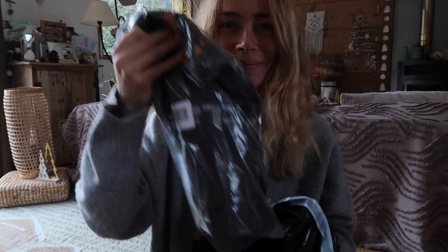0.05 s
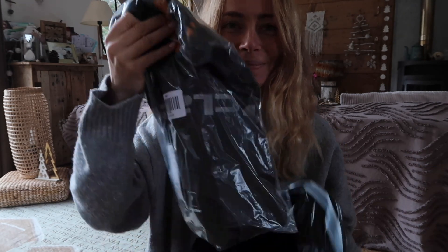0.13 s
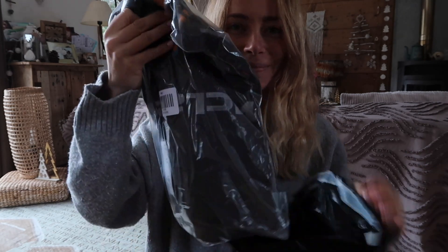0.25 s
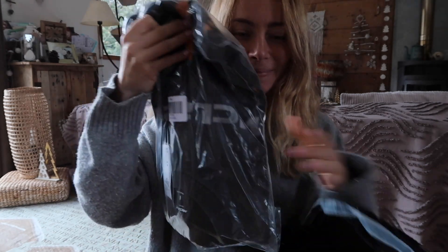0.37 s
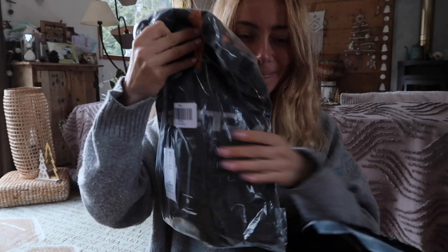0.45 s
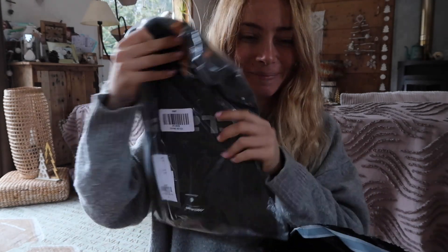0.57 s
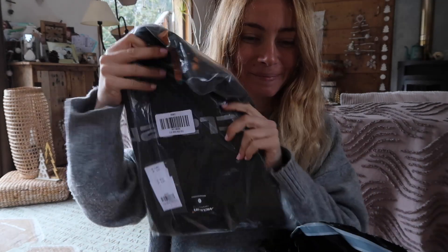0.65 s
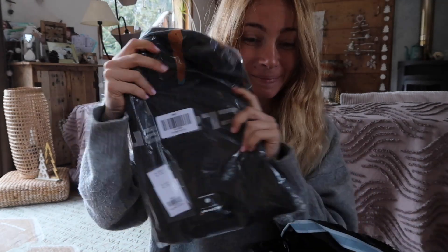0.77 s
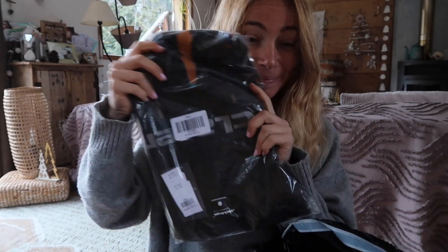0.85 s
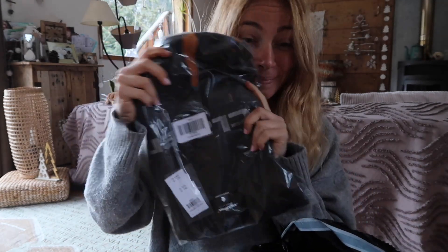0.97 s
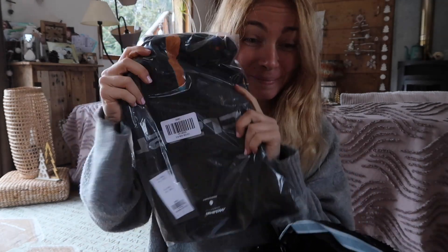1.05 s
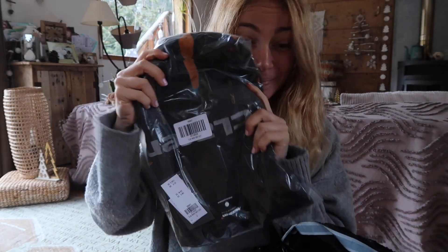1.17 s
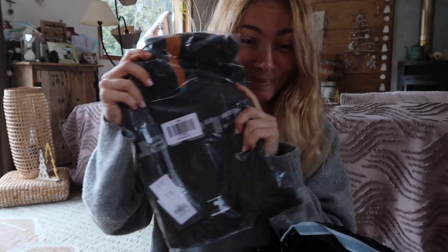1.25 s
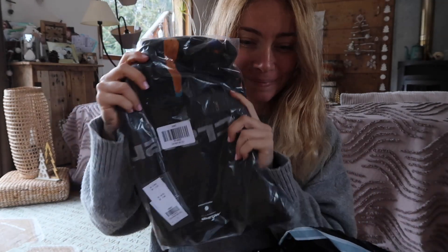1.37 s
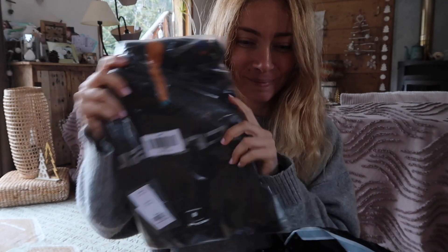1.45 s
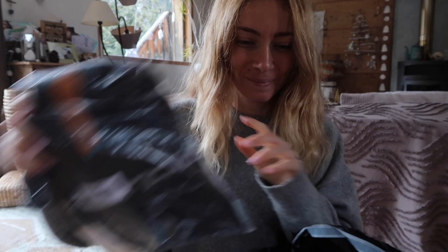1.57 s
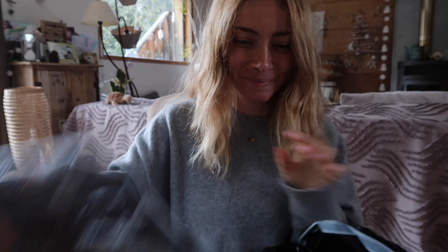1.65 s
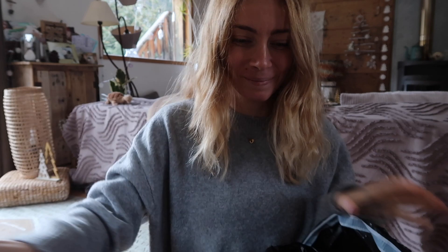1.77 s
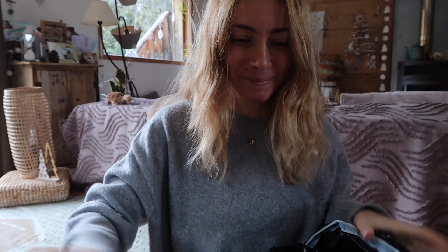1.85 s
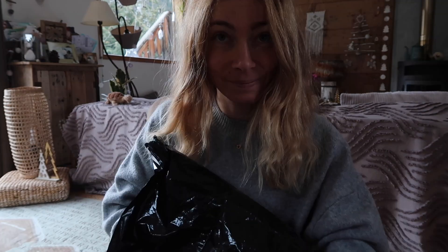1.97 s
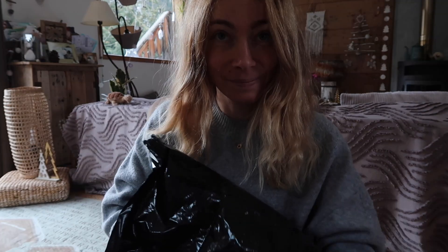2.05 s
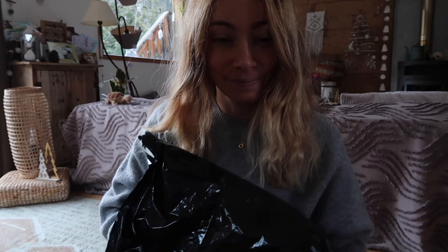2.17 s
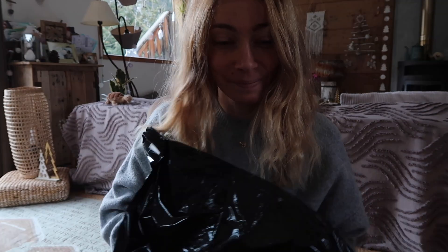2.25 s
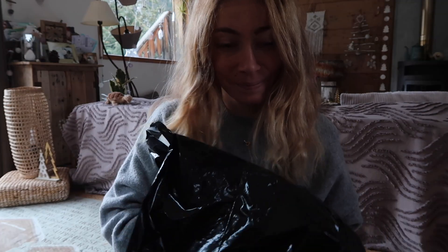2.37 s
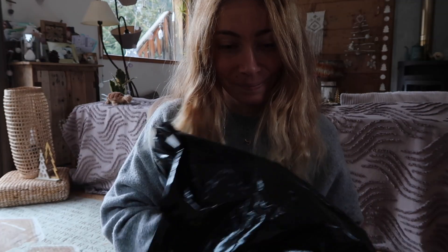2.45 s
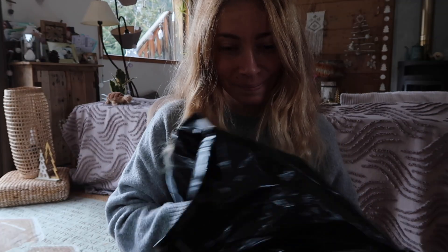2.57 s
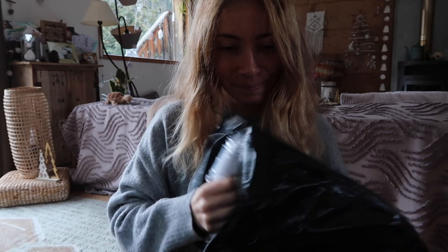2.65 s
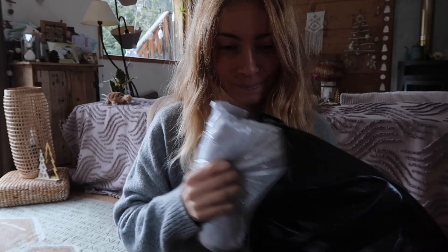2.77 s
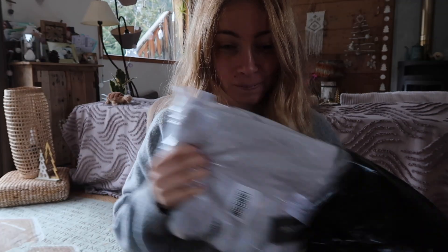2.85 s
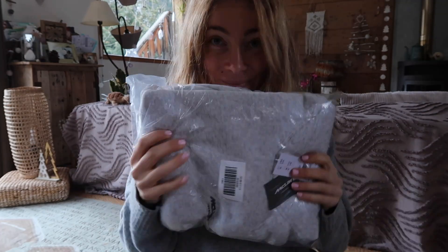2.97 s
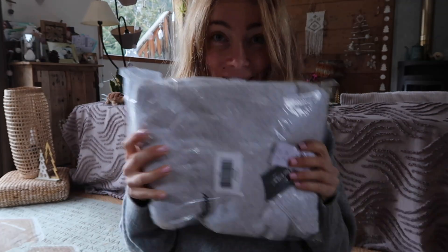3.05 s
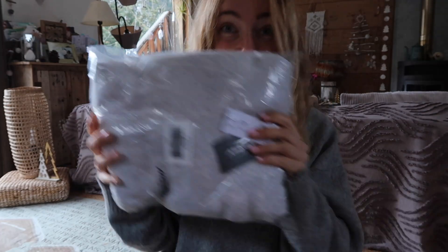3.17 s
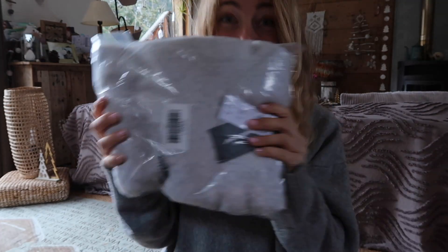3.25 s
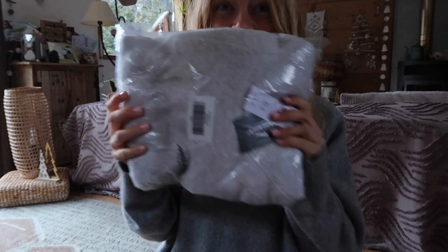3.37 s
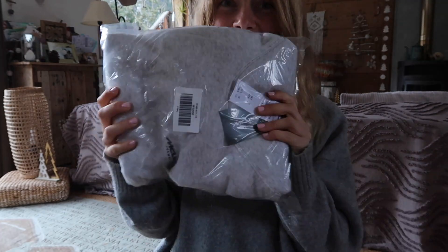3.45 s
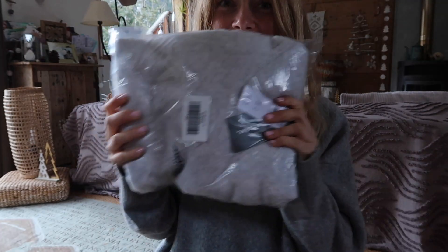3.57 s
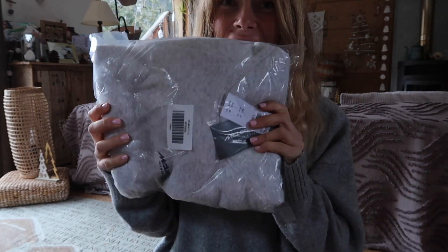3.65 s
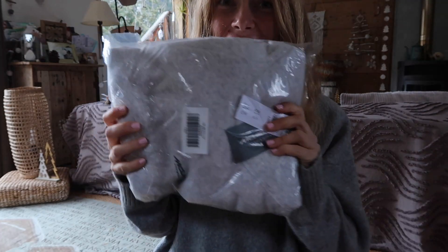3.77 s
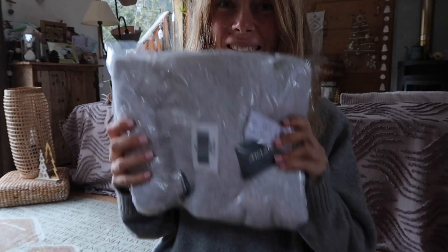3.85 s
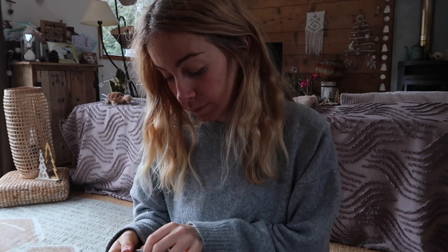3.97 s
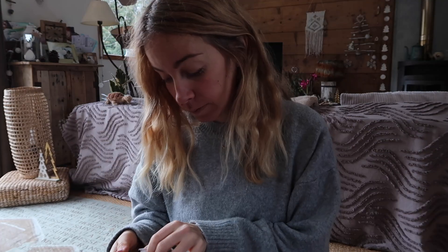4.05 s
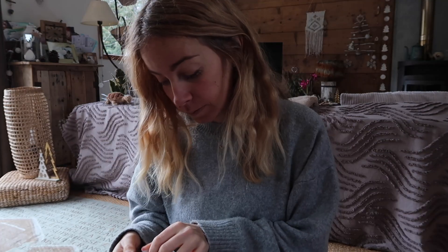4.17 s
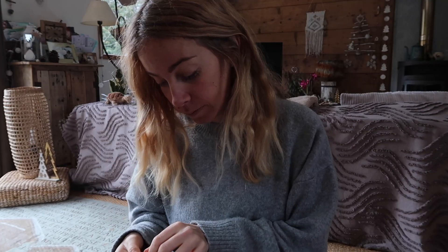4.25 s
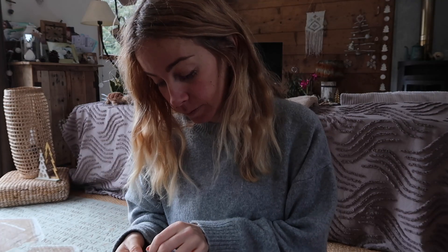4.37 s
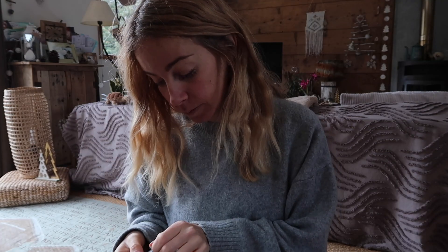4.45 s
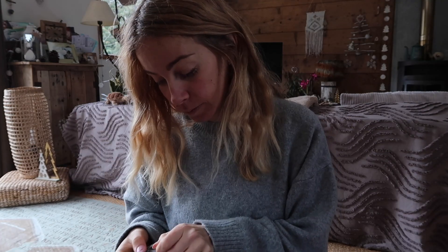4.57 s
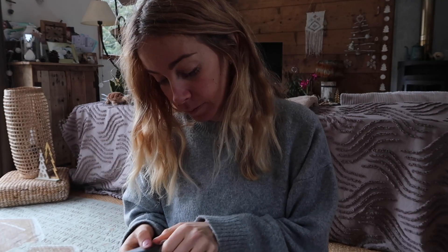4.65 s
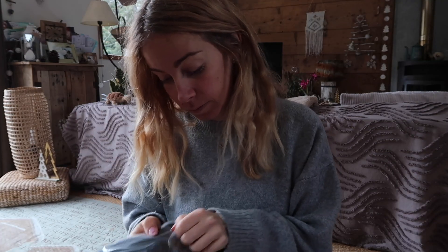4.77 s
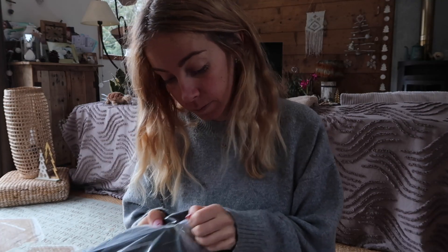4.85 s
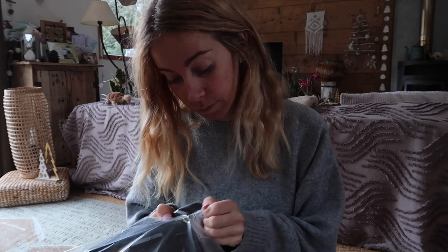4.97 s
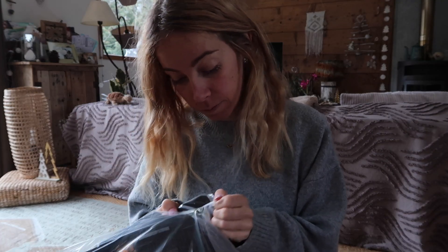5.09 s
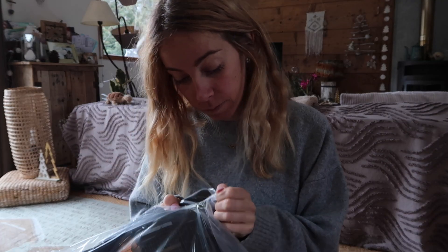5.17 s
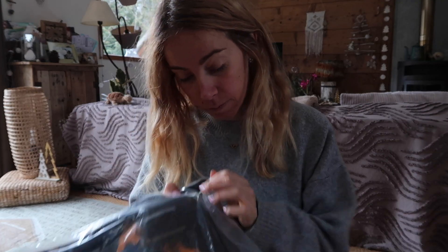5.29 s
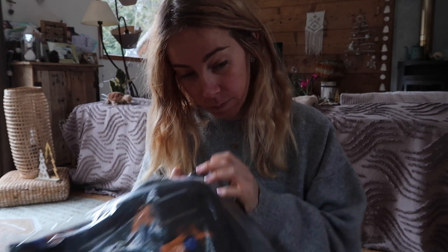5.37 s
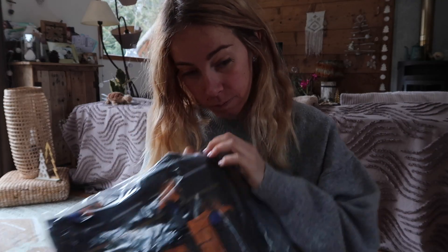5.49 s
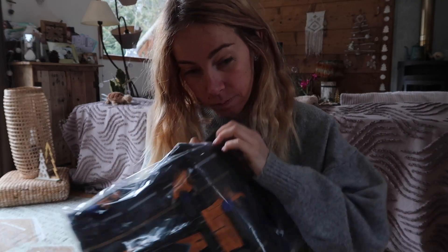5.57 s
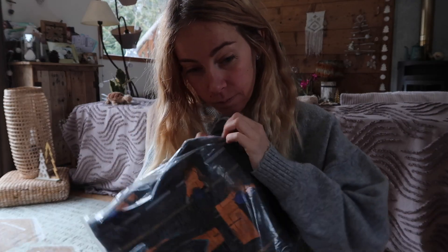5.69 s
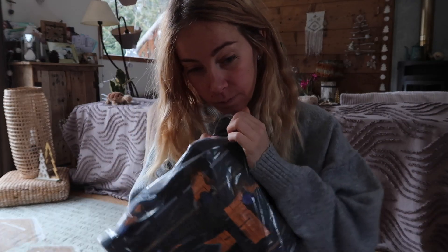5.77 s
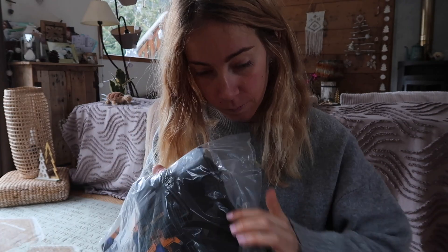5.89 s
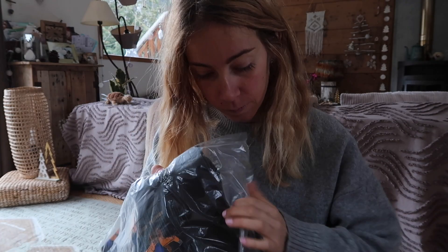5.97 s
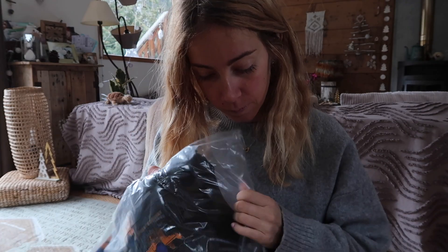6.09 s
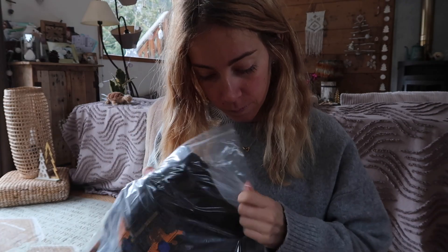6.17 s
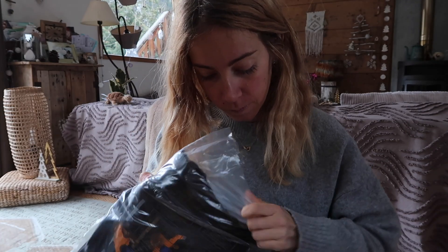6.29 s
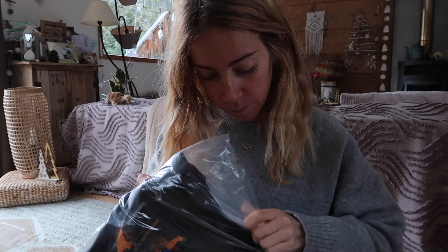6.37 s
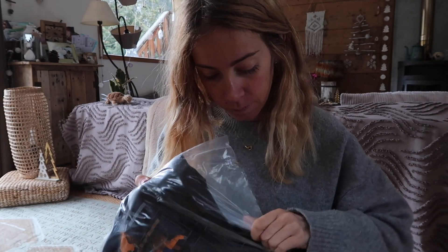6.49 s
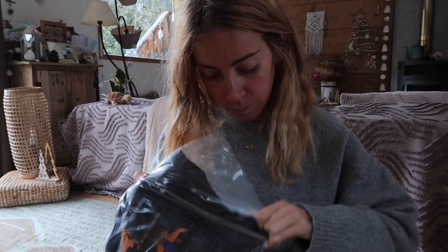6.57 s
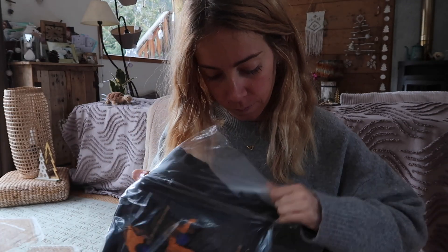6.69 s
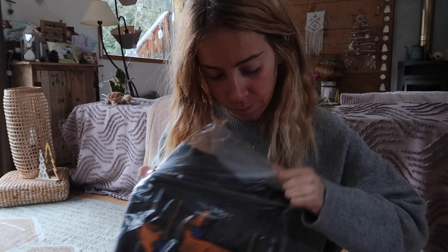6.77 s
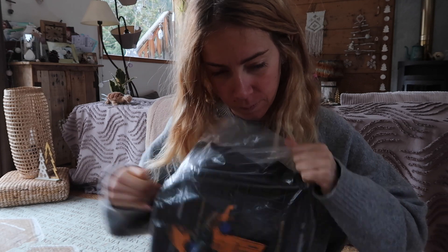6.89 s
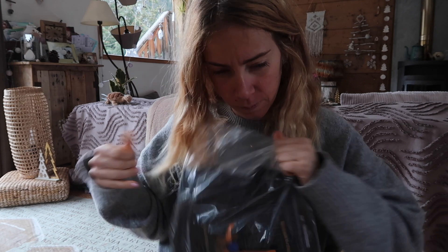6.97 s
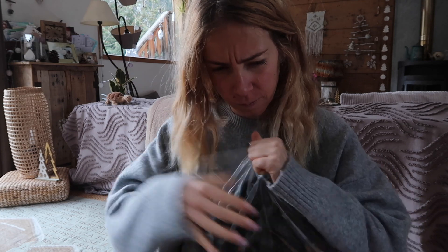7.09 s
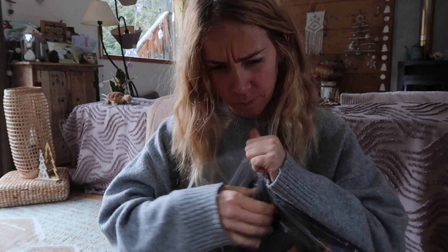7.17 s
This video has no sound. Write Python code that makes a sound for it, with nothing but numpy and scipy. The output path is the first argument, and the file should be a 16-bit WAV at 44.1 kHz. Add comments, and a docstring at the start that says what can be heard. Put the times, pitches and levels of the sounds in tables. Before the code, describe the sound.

Thin plastic polybags and a thicker mailer crinkle and rustle in bursts, with one sharp whip-like crack, a near-quiet lull, then renewed crackling indoors.

```python
"""Plastic film crinkles as hands work thin polybags and a mailer: random clicks excite small ringing facets.
Slack panels flap in low pops, film slides in tiny catches, and creases snap as short damped sine kicks.
Stretched facets ring for longer, and once the grabbed mailer cracks like a whip in four close jolts.
In a lull only fingertips pick at a seal. A furnished room adds sparse reflections, steady hum and hiss."""
import sys
import numpy as np
from scipy import signal
from scipy.io import wavfile

SR = 44100
rng = np.random.default_rng(int(sys.argv[2]) if len(sys.argv) > 2 else 0)


def materialize(psi):
    """Save the field psi as 16-bit PCM at rate SR to the path in sys.argv[1].

    A 1-D psi becomes a single channel; in a 2-D psi each row is a channel.
    """
    bounded = np.clip(np.atleast_2d(psi).T, -1, 1)
    quanta = np.round(bounded * 32767).astype(np.int16)
    wavfile.write(sys.argv[1], SR, quanta)


N = 318843  # samples


def gain_of(db):
    """Logarithmic level: converts decibels to an amplitude ratio."""
    return 10 ** (np.asarray(db) / 20)


def at_time(points):
    """Linear interpolation: draws a table of t/s and value over the whole scene."""
    return np.interp(np.arange(N) / SR, *np.transpose(points))


def at_frequency(points, hz):
    """Logarithmic pitch scale: interpolates a table of f/Hz and value on a log-frequency axis."""
    f, value = np.transpose(points)
    return np.interp(np.log(hz + 1), np.log(f + 1), value)


def wander(per_s, size=4000):
    """Random modulation: straight lines join standard normal values drawn so many times a second."""
    return np.interp(np.arange(N) / SR * per_s, np.arange(size), rng.standard_normal(size))


def colour(x, points, size=4096):
    """Minimum-phase filtering: a causal response shapes the spectrum and keeps clicks sharp in front."""
    frequencies = abs(np.fft.fftfreq(size, 1 / SR))
    log_gain = np.log(gain_of(at_frequency(points, frequencies)))
    # the Hilbert transform of the log gain gives the minimum phase
    response = np.exp(np.conj(signal.hilbert(log_gain)))
    taps = np.fft.ifft(response).real[:size // 2]
    return signal.oaconvolve(x, taps[None], axes=1)[:, :N]


def widen(pair, width):
    """Mid/side stereo: filtering the side alone sets the width at each frequency."""
    return np.vstack([pair[:1], colour(pair[1:], width)])


# Spectral density of the room's hum and hiss: [f/Hz, level/dB]
AMBIENCE_SPECTRUM = [(20, -12.5), (55, -6), (105, -3.5), (280, -7), (600, -15), (1050, -15), (2200, -20),
                     (5000, -27), (10000, -38), (15500, -51)]
# Stereo width of the hum and hiss: [f/Hz, side minus mid level/dB]
AMBIENCE_SIDE = [(50, -17.5), (300, 0.5), (600, 1.5), (2000, -13.5), (5000, 2.5), (12000, -5)]


def ambience(level_db=-54):
    """Stationary noise: filtered Gaussian noise forms the steady low hum and hiss of the room."""
    noise = colour(rng.standard_normal((2, N)), AMBIENCE_SPECTRUM)
    noise /= np.sqrt(np.mean(noise[0] ** 2) + 1e-20)  # mid at rms 1
    return gain_of(level_db) * widen(noise, AMBIENCE_SIDE)


# Reverberation time of the furnished room: [f/Hz, t60/s]
ROOM_DECAY = [(150, 0.27), (1000, 0.27), (4000, 0.24), (12000, 0.079)]


def room(pair, first_s=0.0027, count=8, paths_per_s=14):
    """Frequency-dependent reverberation: sparse reflections decay by band; paths crossfade as the bag moves."""
    shape = (count, 2, SR // 3)
    taps = rng.choice([-1., 1.], shape) * (rng.random(shape) < .1)
    taps[..., :int(first_s * SR)] = 0
    hz, t, bands = signal.stft(taps, SR, nperseg=256)
    decay = gain_of(-60 * t / at_frequency(ROOM_DECAY, hz)[:, None])
    tails = signal.istft(bands * decay, SR, nperseg=256)[1]
    place = np.arange(N) / SR * paths_per_s
    out = np.zeros((2, N))
    for k, tail in enumerate(tails):
        # each set of paths rises and falls over two places, then rests
        share = np.sin(np.pi / 2 * np.minimum((place - k) % count, 2))
        tail = tail / np.linalg.norm(tail[0])
        out += signal.oaconvolve(pair * share, tail, axes=1)[:, :N]
    return out


# Hand movements on the plastic: [start t/s, length t/s, crinkle level/dB,
# swell over the move level/dB, flapping relative to crinkle level/dB]
HAND_MOVES = [ (-.02, 0.23, -31, -8, -1), (0.143, 0.45, -41, 3, -0.5), (0.545, 0.3, -35.5, 3, -9),
              (0.828, 0.045, -26.5, -2.5, -12), (0.866, 0.12, -35.5, 3.5, -11), (0.979, 0.15, -39, 4, -8.5),
              (1.133, 0.5, -41.5, -0.5, -7.5), (1.458, 0.13, -35, -4.5, -4.5),
              (1.637, 0.093, -45.5, 4.5, -9), (1.739, 0.1, -34, 5.5, -7), (1.837, 0.1, -36.5, -11, 3),
              (2.024, 0.21, -53.5, 9.5, 1.5), (2.2, 0.11, -29, -4, -4), (2.321, 0.068, -34.5, 2, 1),
              (2.391, 0.08, -34.5, 3, -2), (2.476, 0.098, -27, -3, -2), (2.575, 0.045, -35, 0.5, 0),
              (2.608, 0.16, -24.5, 4.5, -5), (2.769, 0.14, -27, 2, 0), (2.882, 0.089, -22, -6.5, -3),
              (2.983, 0.1, -39.5, 4.5, -9), (3.067, 0.39, -41.5, -1.5, -4), (3.452, 0.28, -44.5, -4.5, -5),
              (3.75, 0.097, -46, -8, -2), (3.849, 0.073, -51, 2, -3), (3.951, 0.75, -61.5, -6, 0),
              (4.158, 0.14, -59.5, 1.5, -8), (4.617, 0.45, -50.5, -6, -2), (4.831, 0.12, -39.5, 2, -13),
              (4.984, 0.073, -46.5, 2.5, -3.5), (5.087, 0.094, -44.5, -1.5, -4),
              (5.18, 0.11, -52.5, -3.5, -4), (5.289, 0.22, -46.5, 3.5, -2.5), (5.491, 0.13, -40.5, 4, -4),
              (5.619, 0.19, -40, -2.5, -2.5), (5.749, 0.081, -40.5, -0.5, -11),
              (5.835, 0.081, -46, -0.5, -3.5), (5.981, 0.066, -50, 5.5, 0), (6.056, 0.2, -38, 3, -1.5),
              (6.25, 0.049, -31.5, 1, -3), (6.345, 0.11, -41.5, 7, -3), (6.472, 0.17, -37.5, -6, 0),
              (6.618, 0.2, -35, -11, -4.5), (6.799, 0.13, -38, 4, -6), (6.966, 0.14, -36.5, -0.5, -3.5),
              (7.116, 0.27, -44, 7, -4)]


def handling(grab_s=0.019, relax_db_per_s=397, unsteady_db=1.16):
    """Energy addition: moves that grip, swell or ease, then relax sum in power to crinkle and flap levels."""
    t = np.arange(N) / SR
    power = np.full((2, N), 1e-9)
    for start, length, db, swell_db, slack_db in HAND_MOVES:
        age = t - start
        grab = np.clip(age / grab_s, 0, 1)
        level_db = db + swell_db * np.clip(age / length, 0, 1)
        level_db -= relax_db_per_s * np.clip(age - length, 0, 1)
        power += (grab * gain_of(level_db) * gain_of([[0], [slack_db]])) ** 2
    # an unsteady hand wobbles both levels together
    return 10 * np.log10(power) + unsteady_db * wander(18)


def buckles(per_s, spread_db, ring_s, largest, count=600):
    """Random impulse excitation: many small and few large clicks ring facets of film, as mid and side."""
    at = np.flatnonzero(rng.random(N) < per_s / SR)
    size = gain_of(spread_db * np.minimum(rng.exponential(1, N), largest)) * rng.choice([-1, 1], N)
    facet = rng.integers(0, count, N)
    t = np.arange(SR // 60) / SR
    # small facets ring higher and die sooner
    life_s = ring_s * np.geomspace(.5, 2, count)[:, None, None]
    hz = rng.uniform(0.632, 1.699, (count, 1, 1)) / life_s
    tone = np.sin(2 * np.pi * (hz * t + rng.random((count, 2, 1))))
    # a slack facet only ticks, a stretched one rings on
    tone_s = life_s * (1 + 2.0 * rng.random((count, 1, 1)) ** 4)
    ragged = rng.standard_normal((count, 2, len(t))) * np.exp(-t / (0.77 * life_s))
    rings = ragged + 0.75 * tone * np.exp(-t / tone_s)
    # each facet gives way over a moment
    rings *= 1 - np.exp(-t / (0.34 * life_s))
    rings /= np.linalg.norm(rings, axis=2, keepdims=True)
    out = np.zeros((2, N + len(t)))
    for i in at:
        out[:, i:i + len(t)] += size[i] * rings[facet[i]]
    return out[:, :N]


def follow(pair, level_db, span_s):
    """Short-time power: dividing by it imposes a level curve but keeps grain shorter than the span."""
    window = signal.windows.hann(int(span_s * SR))
    power = signal.oaconvolve(pair[0] ** 2, window / window.sum(), "same")
    return pair * gain_of(level_db) / np.sqrt(abs(power) + 1e-12)


# Filter for film slipping on film: [f/Hz, level/dB]
SLIDING_FILTER = [(1000, 4.5), (3000, 11.5), (5500, 5.5), (7400, 4), (9600, -8), (12000, -1.5), (14000, -5),
                  (16000, -19)]
# How much film slides on film: [t/s, fizz relative to crinkle level/dB]
SLIP_LEVEL = [(0.701, -7.5), (1.5, -11.5), (1.88, -6), (2.35, -10), (2.75, -10), (4.5, -4.5), (5.602, -8.5),
              (6.2, -6.5), (7.1, -8)]


def sliding(crinkle_db, per_s=3500, spread_db=2.5, ring_s=0.0002724):
    """Stick-slip friction: thousands of tiny catches fizz, now gripping and now letting go."""
    grip_db = 2.6 * wander(22)
    catches = colour(buckles(per_s, spread_db, ring_s, largest=15.0), SLIDING_FILTER)
    return follow(catches, crinkle_db + at_time(SLIP_LEVEL) + grip_db, span_s=0.051)


# Filter for wide slack panels: [f/Hz, level/dB]
PANEL_FILTER = [(35, -20), (65, -8), (120, 3), (190, 2), (330, 1.5), (430, 1), (750, -6), (1100, -10.5),
                (2200, 5), (6000, -101.5)]


def flapping(level_db):
    """Low-frequency plate motion: wide slack panels flip over with soft low pops."""
    pops = buckles(per_s=800, spread_db=3.6, ring_s=.0015, largest=4.0)
    return follow(colour(pops, PANEL_FILTER), level_db, span_s=0.043)


def snap_through(rows, cycles, flutter, flutter_s, yield_s=0.00089):
    """Snap-through instability: film yields, kicks as a damped sine, and the sheet around it shivers."""
    t = np.arange(SR // 20) / SR
    lead = SR // 300  # room for the yielding before the kick
    age = t - t[lead]
    envelope = np.exp(np.minimum(age / yield_s, -age / flutter_s))
    out = np.zeros((2, N + len(t)))
    for s, db, hz in rows:
        # the film springs out and back, so it leaves no net push of air
        push = t * np.exp(-hz * t / cycles) * np.sin(2 * np.pi * hz * t)
        kick = np.diff(push, prepend=0)
        # the shiver leaves a gap around the kick
        shiver = rng.standard_normal(len(t)) * envelope * (abs(age) > .5 / hz)
        shiver = signal.fftconvolve(kick, shiver)[:len(t)]
        shiver *= np.linalg.norm(kick) / np.linalg.norm(shiver)
        snap = np.roll(kick, lead) + flutter * shiver
        snap *= gain_of(db) / abs(snap).max()
        # a quadrature side shifts the phase between left and right
        side = rng.choice([-1, 1]) * signal.hilbert(snap, 2 * len(t)).imag[:len(t)]
        first = round(s * SR) - lead
        out[:, first:first + len(t)] += [snap, side]
    return out[:, :N]


# Whole panels popping over: [t/s, peak level/dB, f/Hz]
PANEL_POPS = [(.0105, -32, 438), (.4035, -27, 339), (1.4805, -27.5, 710), (1.4835, -25.5, 470),
              (1.8475, -19, 430), (6.1005, -25, 483), (6.669, -34, 199), (6.8555, -25, 725)]


def panel_pops():
    """Bistable shells: whole panels pop over at low pitch with a strong shiver."""
    return snap_through(PANEL_POPS, cycles=0.45, flutter=1.0, flutter_s=0.0034)


# Stretched facets flipping: [t/s, peak level/dB, f/Hz]
FACET_RINGS = [(.5763, -14.5, 2600), (2.2272, -17, 2450), (2.371, -20, 2450), (2.4305, -16.5, 2380),
               (2.4478, -14, 2330), (4.916, -21, 2200), (5.146, -25, 2530), (6.8897, -17, 2130),
               (7.0497, -16.5, 3350)]


def ringing_facets():
    """Lightly damped resonance: stretched facets flip and ring on for several cycles."""
    return snap_through(FACET_RINGS, cycles=1.6, flutter=.35, flutter_s=.002)


# Single creases snapping, from sharp loud ticks to faint ones: [t/s, peak level/dB before the filter, f/Hz]
CREASE_SNAPS = [(.0914, -18, 2320), (.182, -19, 2400), (.637, -16, 2700), (.712, -11, 3200),
                (.8412, -10, 2750), (.8826, -14, 2860), (.9723, -13, 3000), (1.0764, -15, 2900),
                (1.105, -15.5, 2900), (1.1807, -15.5, 2400), (1.199, -17, 2700), (1.2931, -23, 3000),
                (1.3225, -22, 1800), (1.4476, -22, 3050), (1.5084, -21, 2600), (1.6078, -18, 3250),
                (1.6397, -25, 3000), (1.6646, -23, 2020), (1.7343, -22, 2960), (2.0202, -38, 1830),
                (2.254, -17, 2800), (2.843, -7.5, 1800), (3.0782, -22, 2320), (3.3892, -22.5, 2480),
                (3.5131, -26, 2480), (3.6453, -30, 3000), (3.7596, -31, 2190), (3.9024, -30, 1980),
                (4.1732, -41, 1300), (4.2464, -35, 2900), (4.4027, -34.5, 2670), (4.4235, -37, 2600),
                (4.4327, -33.5, 2700), (4.4705, -23.5, 2700), (4.5742, -29, 1420), (4.6426, -31, 2300),
                (4.6692, -27.5, 3030), (4.7336, -29, 3100), (4.8455, -27, 2800), (4.8682, -22, 2390),
                (4.9245, -16, 2570), (4.9333, -22, 1900), (5.0182, -27, 2000), (5.0509, -24, 2430),
                (5.0993, -15.5, 2150), (5.1178, -27, 2386), (5.1376, -29, 2260), (5.1547, -24, 2600),
                (5.2994, -30, 2830), (5.3902, -26.5, 2650), (5.427, -21.5, 2470), (5.7817, -19, 2320),
                (5.8652, -25, 2660), (5.8851, -24, 2060), (5.9824, -30, 1880), (6.0195, -23, 3000),
                (6.0793, -19, 2890), (6.1664, -19, 2800), (6.2792, -13, 2265), (6.3869, -21, 2800),
                (6.439, -22, 1400), (6.4897, -13.5, 2546), (6.5283, -23, 1500), (6.6301, -19, 2600),
                (6.7694, -20.5, 1960), (6.8568, -18, 1500), (6.9251, -19, 3000), (7.0412, -20, 2020),
                (7.1013, -15, 2200), (7.1737, -20, 2095)]
# Filter for a snapping crease: [f/Hz, level/dB]
CREASE_FILTER = [(1500, 4), (4000, -1), (7000, -4), (9700, -8.5), (12000, 3), (15500, 1)]


def snapping_creases():
    """Heavily damped resonance: single creases snap through with a dry tick."""
    return colour(snap_through(CREASE_SNAPS, cycles=.29, flutter=.54, flutter_s=.0015), CREASE_FILTER)


# Jolts of the mailer whipping taut: [t/s, peak level/dB before the filter, f/Hz]
CRACK_JOLTS = [(1.8467, -15, 1250), (1.8484, -0.5, 1740), (1.8495, -5, 870), (1.8516, -12, 2160)]
# Filter for the full, dull crack: [f/Hz, level/dB]
CRACK_FILTER = [(45, -20), (100, 28), (450, 6.5), (2500, 1.5), (4000, -4), (6000, 5), (12000, -12)]


def mailer_crack():
    """Impulsive tension: the thick mailer whips taut in a few quick jolts that merge into one crack."""
    return colour(snap_through(CRACK_JOLTS, cycles=.3, flutter=.26, flutter_s=.005), CRACK_FILTER)


# Which bag is in the hands: [t/s, share of the thick mailer 0-1, the rest thin polybag]
MAILER_SHARE = [(1.65, 0.055), (1.8, 0.89), (2.95, 0.79), (3.1, 0.2)]
# Filter for thin polybag film: [f/Hz, level/dB]
POLYBAG_FILTER = [(200, -12), (700, -5), (1100, -6.5), (1500, -4), (2400, 1), (3300, -2), (4200, -7.5),
                  (5100, -19), (7200, -30), (9600, -52), (12000, -27), (15500, -33)]
# Filter for the duller thick mailer: [f/Hz, level/dB]
MAILER_FILTER = [(200, -12), (650, 0), (1050, -7.5), (1500, -9), (2300, -1), (3200, -7), (4200, -12.5),
                 (5100, -19), (7200, -19.5), (9600, -54), (12500, -36.5), (15500, -45)]
# Film pulled taut rings brighter: [t/s, lift of the treble level/dB]
TENSION_LIFT = [(.45, 2), (.7, 4), (1.1, 4), (1.8, 1), (2.7, 2), (3.4, 3.5), (4.9, 1), (7.1, 2.5)]
# Part of the spectrum that tension lifts: [f/Hz, level/dB]
TENSION_FILTER = [(1500, -29.5), (2500, -3.5), (3800, 0.5), (15500, -1)]


def crinkle(level_db, per_s=560, busier_db=19, spread_db=2.1, ring_s=0.000578):
    """Buckling of thin sheets: facets give way more often and more loudly the harder the bag is worked."""
    thick = np.clip(at_time(MAILER_SHARE), 0, 1)
    # the large mailer has more facets moving at once, so it rushes more than it ticks
    base_rate = per_s * (1 + thick)
    # the rate quadruples for each busier_db of level
    rate = base_rate * 4 ** (np.minimum(level_db + 38.0, 10) / busier_db)
    clump_db = 2.4 * wander(110)
    clicks = buckles(rate, spread_db, ring_s, largest=4.4) * gain_of(clump_db)
    film = (1 - thick) * colour(clicks, POLYBAG_FILTER) + thick * colour(clicks, MAILER_FILTER)
    # the tension shifts from one clump to the next
    taut_db = at_time(TENSION_LIFT) + 2.2 * wander(35)
    film = film + (gain_of(taut_db) - 1) * colour(film, TENSION_FILTER)
    return follow(film, level_db, span_s=.09)


# Stereo width of the plastic and its reflections: [f/Hz, side minus mid level/dB]
PLASTIC_SIDE = [(2300, -76), (3300, -19.5), (4300, -4), (6500, -4), (9500, 9), (12000, 6), (15000, -7)]


def scene():
    """Superposition: all plastic sounds share one place and one soft room, over the steady ambience."""
    crinkle_db, flap_db = handling()
    plastic = sliding(crinkle_db) + flapping(flap_db)
    plastic += panel_pops() + ringing_facets()
    plastic += snapping_creases() + mailer_crack()
    plastic += crinkle(crinkle_db)
    in_room = plastic + gain_of(-12.5) * room(plastic)
    mid, side = widen(in_room, PLASTIC_SIDE) + ambience()
    return np.array([mid + side, mid - side])


def record(dry, edge_hz=15750):
    """Saturation and band limiting: peaks clip at full scale, then a linear-phase low-pass ends the treble."""
    low_pass = signal.firwin(511, edge_hz, window=("kaiser", 9), fs=SR)
    return signal.oaconvolve(np.clip(dry, -1, 1), low_pass[None], "same")


dry = scene()
out = record(dry)
materialize(out)
```